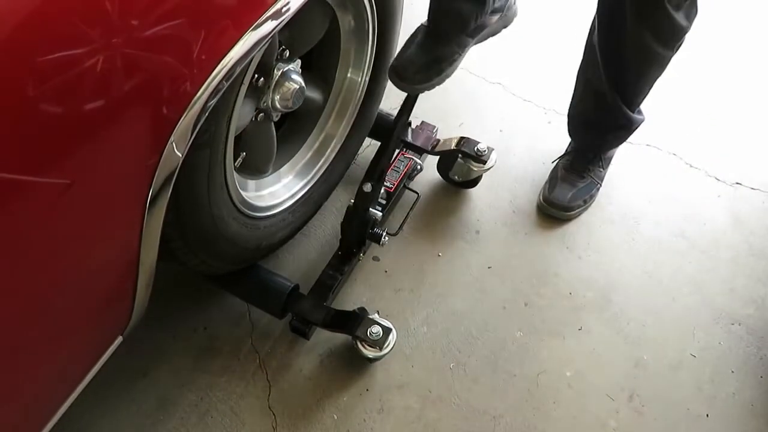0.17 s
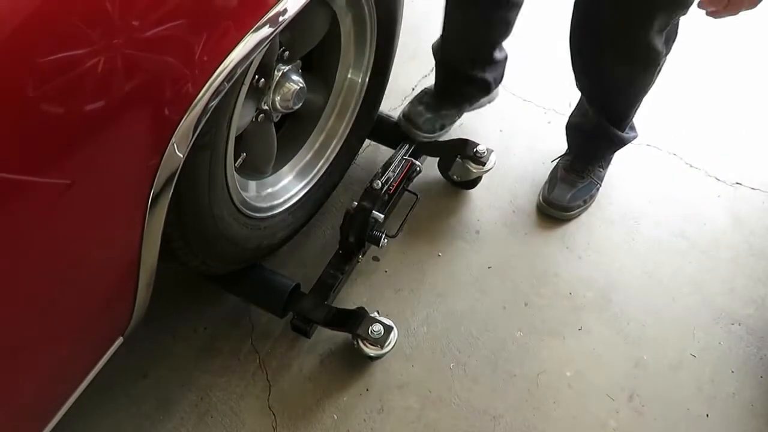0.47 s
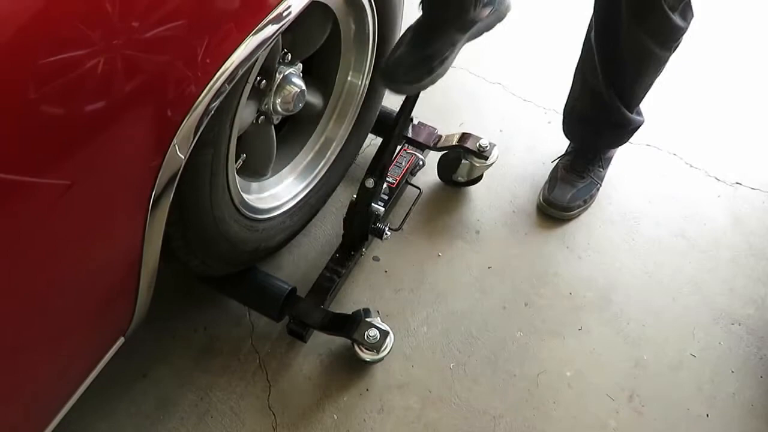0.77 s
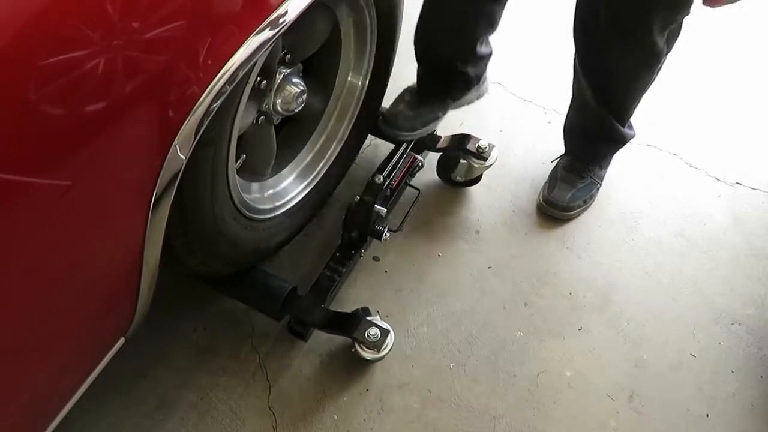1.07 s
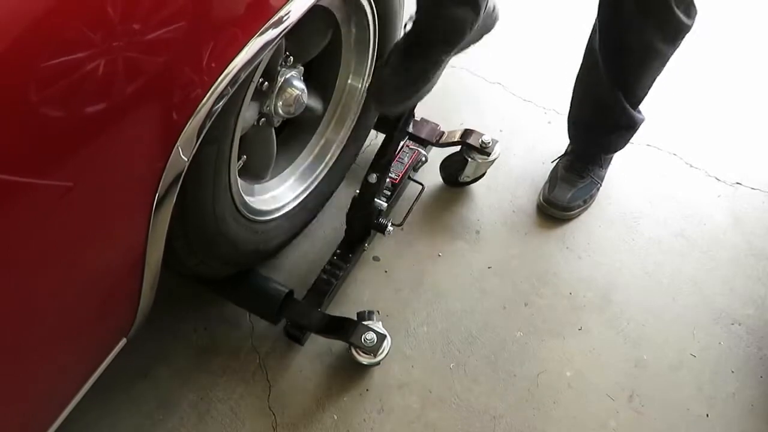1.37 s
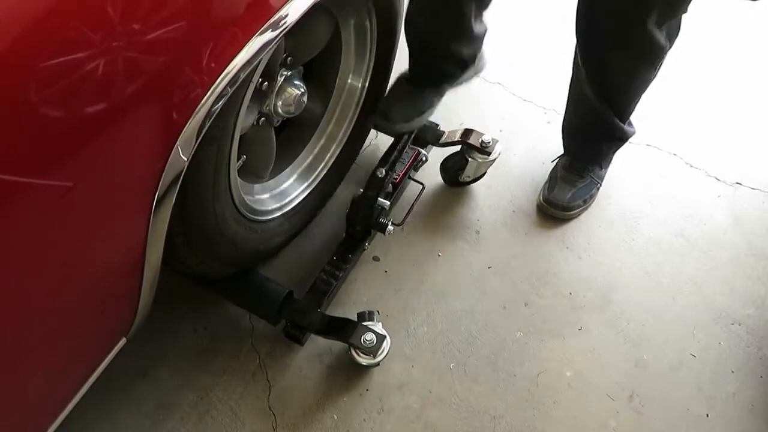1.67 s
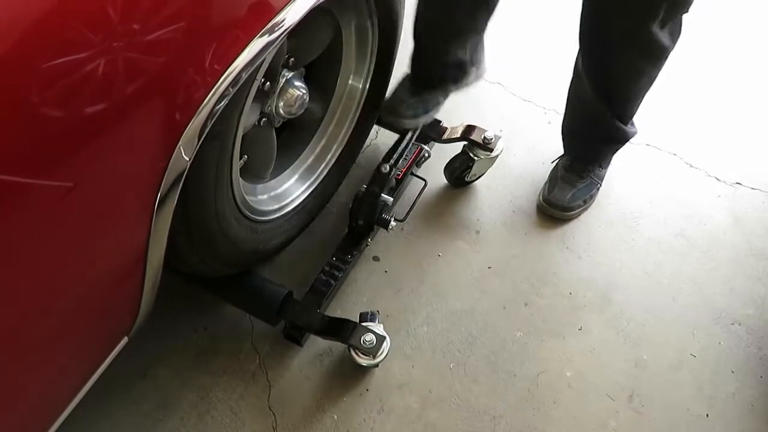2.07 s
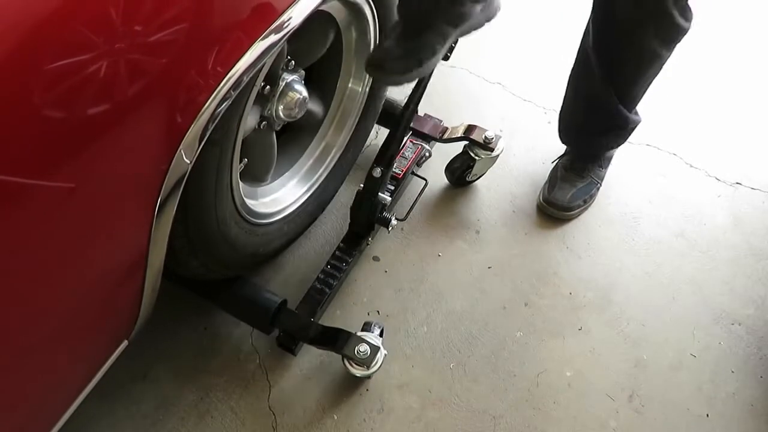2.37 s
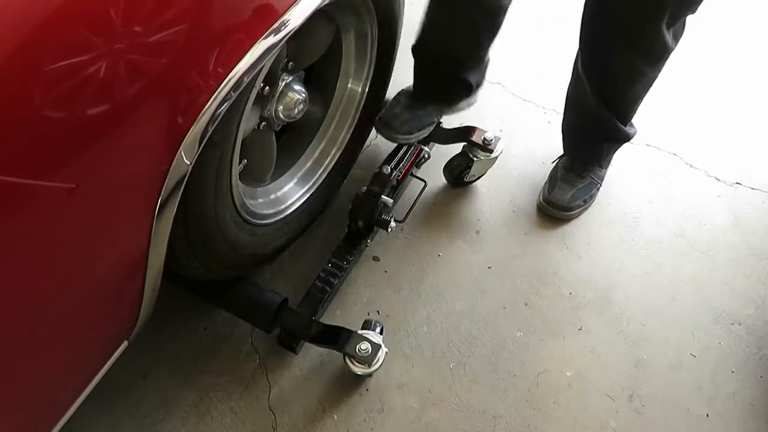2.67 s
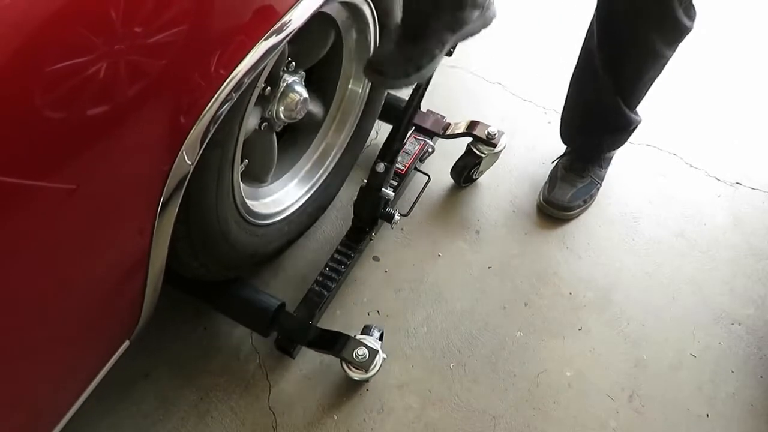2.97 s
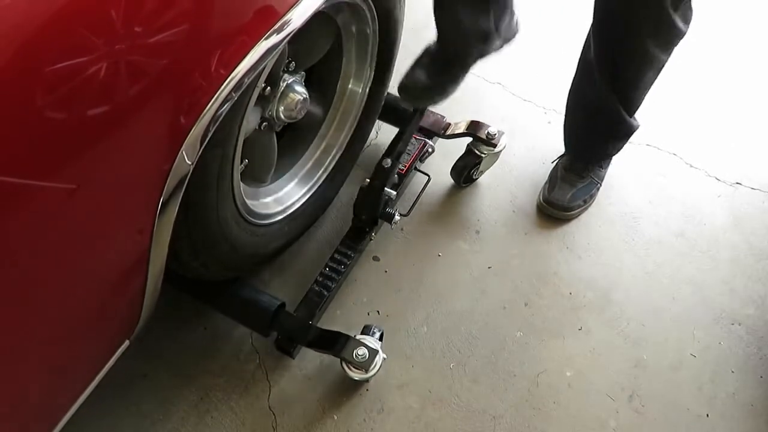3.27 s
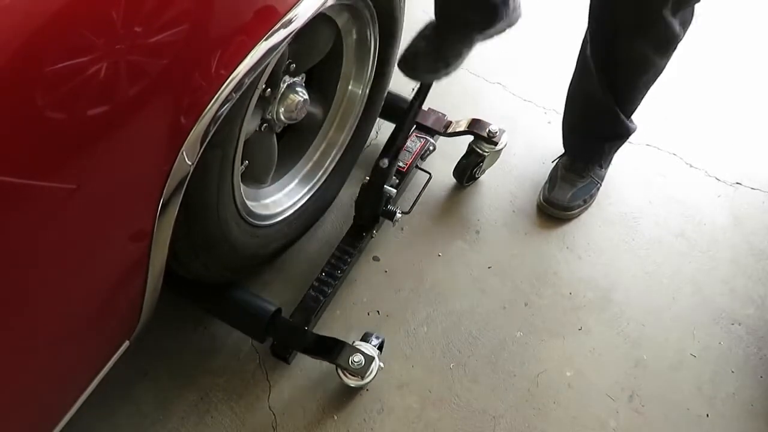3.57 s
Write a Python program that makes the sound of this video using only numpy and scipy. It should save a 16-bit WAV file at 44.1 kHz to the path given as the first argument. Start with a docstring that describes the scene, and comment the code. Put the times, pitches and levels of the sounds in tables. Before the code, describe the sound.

A foot-pumped steel ratchet clacks close by in a garage. A clattering stroke starts near 0.15 s, with looser clicks to 0.6 s. Bursts follow at about 0.8, 1.35, 1.9, 2.45 and 3.05 s, with lighter return clacks between and a last cluster from 3.4 s. Gritty scraping, short metallic rings and soft low thumps accompany them; a tiny squeak chirps at 0.77 s. Short echo, faint room noise.

```python
"""A garage with a concrete floor: a foot pumps the pedal of a steel wheel dolly close to a two-port microphone.
Each stroke drags the pawl over the rack as dense noise grains, with clacks of filtered noise rattle.
The pawl drops home and rings as dying sines, and the frame thumps in low modes under the car's weight.
A brief chirp squeaks once. Sparse random taps make the garage's short tail, over steady coloured noise."""
import sys
import numpy as np
from scipy import signal
from scipy.fft import rfft, irfft
from scipy.io import wavfile
from scipy.ndimage import uniform_filter1d

SR = 44100
rng = np.random.default_rng(int(sys.argv[2]) if len(sys.argv) > 2 else 0)


def natural_amplitude(level_db):
    """Convert a level in decibels to a linear amplitude factor, elementwise."""
    exponent = np.asarray(level_db, float) / 20
    return 10 ** exponent


def waveform_to_disk(signal):
    """Save audio, clipped to [-1, 1], as 16-bit WAV at the path in sys.argv[1]."""
    frames = np.transpose(np.atleast_2d(signal))
    scaled = np.clip(frames, -1, 1) * 32767
    samples = np.round(scaled).astype(np.int16)
    wavfile.write(sys.argv[1], SR, samples)


N = 163170

# Resonances of the steel frame. Each row: frequency in Hz, width in Hz (narrow ones are widened in use),
# relative level in dB.
FRAME = [(463, 28, 8), (600, 42, 6.5), (810, 65, 0.5), (1617, 380, -0.5), (2245, 410, 8.5), (2630, 23, 1.5),
         (3470, 590, 5), (4280, 140, 3.5), (5040, 210, 6), (5920, 60, 2), (7210, 250, 4), (8300, 67, 7),
         (9070, 92, 4.5), (11040, 76, -6), (12670, 71, -7), (13800, 130, 6), (14500, 150, 10)]


def evened(x):
    """Scales to unit rms."""
    return x / np.sqrt(np.mean(x ** 2) + 1e-20)


def read(points, hz):
    """Reads a spectrum table on a log-frequency axis."""
    f, value = np.transpose(points)
    return np.interp(np.log(hz + 1), np.log(f + 1), value)


def add(mix, s, sound):
    """Mixes a sound in at a time in seconds."""
    part = mix[round(s * SR):][:len(sound)]
    part += sound[:len(part)]


def coloured(x, points):
    """Filters by a spectrum table in dB, without phase shift."""
    gain = natural_amplitude(read(points, np.fft.rfftfreq(x.shape[-1], 1 / SR)))
    return irfft(rfft(x) * gain, x.shape[-1])


def ring(modes, t, spread_db, luck, turns=0):
    """Sum of dying sine modes, each struck more or less well."""
    hz, db, t60 = np.transpose(modes)[:, :, None]
    level = natural_amplitude(db + spread_db * luck[:, None] - 60 * t / t60)
    return (level * np.sin(2 * np.pi * (hz * t + turns))).sum(0)


def frame(hz):
    """Response of each resonance of the steel frame."""
    f, width, mode_db = np.transpose(FRAME)[:, :, None]
    width = np.maximum(width, 75)  # least width in Hz
    return natural_amplitude(mode_db) * width / (width + 1j * (hz - f ** 2 / hz))


def room_floor():
    """Steady coloured noise under everything, independent in mid and side."""
    # Each row: frequency in Hz, relative density in dB per Hz.
    floor_colour = [(18, -51), (30, 11.5), (81, 6.5), (540, -14), (1430, -14), (1760, -8.5), (7470, -20.5),
                    (12600, -35.5), (16000, -73)]
    return natural_amplitude(-44.5) * evened(coloured(rng.standard_normal((2, N)), floor_colour))


def earlier_stroke():
    """A short burst at the very start, sent only to the garage: the tail of a stroke just before."""
    # Each row: frequency in Hz, relative density in dB per Hz.
    earlier_colour = [(59, -42), (100, -9), (836, -3), (1170, -11), (2270, -2), (4980, -32), (8640, -50),
                      (16000, -82)]
    out = np.zeros(N)
    add(out, 0, natural_amplitude(-21.5) * evened(coloured(rng.standard_normal(800), earlier_colour)))
    return out


def garage_tails():
    """Sparse taps of random sign, each band dying at its own speed; one tail for mid, one for side."""
    # Decay of the garage. Each row: frequency in Hz, time to fall 60 dB in seconds.
    garage_t60 = [(100, 0.56), (260, 0.71), (700, 0.45), (1840, 0.42), (4850, 0.24), (12800, 0.19)]
    taps = np.zeros((2, SR))
    # one tap at a random place in every 20 samples
    at = np.arange(200, SR - 20, 20) + rng.integers(0, 20, (2, (SR - 201) // 20))
    np.put_along_axis(taps, at, rng.choice([-1., 1.], at.shape), 1)
    hz, t, z = signal.stft(taps, SR, nperseg=256)
    decay = natural_amplitude(-60 * t / read(garage_t60, hz)[:, None])
    tail = signal.istft(z * decay, SR, nperseg=256)[1]
    return tail / np.linalg.norm(tail[0])


def clacks():
    """A short uneven rattle drives the struck part and the frame's resonances, differently at each blow."""
    # Steel on steel. Each row: time in seconds, relative level in dB, pitch of the struck part in Hz,
    # weight below 1.2 kHz in dB and brightness above 5 kHz in dB, both against the band between.
    blows = [(0.0994, -32, 1670, -3, -15), (0.1635, -11.5, 3400, -30, -7), (0.1685, -9.5, 2400, -38, -3),
             (0.1895, -8, 4850, -29, -2), (0.2011, -3.5, 2900, -3.5, -2), (0.2267, 0.5, 1990, -7.5, -14),
             (0.256, -8.5, 2330, 9, 22), (0.3574, -11, 7200, -5, 13), (0.3674, -16.5, 6600, -11, 2),
             (0.4064, -19, 2780, -6, 1.5), (0.4416, -16, 2240, -13, -13), (0.4873, -6, 4540, -8, -0.5),
             (0.5309, -10.5, 2430, -9, -0.5), (0.595, -7.5, 1920, -3.5, -29),
             (0.7952, -10, 3000, -11.5, -1), (0.8115, -3.5, 5040, -35, 5.5), (0.8402, -5.5, 1950, -2, -7.5),
             (0.8641, -4.5, 3300, -8, 20), (0.8804, -8.5, 2250, -10, -7), (0.898, -8, 7800, -10.5, -1.5),
             (0.9553, -10, 6900, -7, 9), (0.965, -6, 7300, -12, 10), (1.0164, -25.5, 6850, 6, 8),
             (1.0522, -14, 5030, -6, -2), (1.0846, -2, 5920, -1.5, 3.5), (1.1238, -13, 6560, -2, 5),
             (1.3345, -17, 3370, -30, -7.5), (1.3405, -15.5, 2310, -35, -1), (1.3562, -7.5, 1850, -20, 3.5),
             (1.3852, -4, 2150, -3, -0.5), (1.4097, -4.5, 2800, -7, 31), (1.4377, -2, 2400, -8, 3.5),
             (1.4864, -14.5, 6100, 3, 17), (1.4966, -7, 7040, -12, 12.5), (1.5438, -20, 5370, -19, 13),
             (1.622, -13, 1540, -32, -4), (1.6574, -2.5, 1260, -7.5, -2), (1.695, -10.5, 1890, 3.5, 7),
             (1.8721, -14, 3370, -20, -4), (1.8927, -4, 5100, -32, 7), (1.9214, -4.5, 5470, -2.5, 1),
             (1.9435, -4, 1940, 2, 8.5), (1.9704, -5.5, 2350, -10.5, 3), (2.035, -10.5, 9400, -18, 7),
             (2.0944, -25, 2060, -13, 15), (2.148, -34.5, 600, 5, -16), (2.1974, -11.5, 3670, -11, -0.5),
             (2.2257, -6.5, 2100, -5, -3), (2.2719, -10.5, 2630, -5.5, 2), (2.4293, -19.5, 620, 5.5, -10),
             (2.4414, -14.5, 3300, -31, 0), (2.4599, -10, 8300, -17, 3), (2.4907, -7, 3750, 0.5, 0),
             (2.513, -3, 2770, -7, 5.5), (2.5358, -1.5, 8800, -20, 6.5), (2.5862, -17, 4500, -30, 18),
             (2.598, -9.5, 8050, -28, 7), (2.6374, -22.5, 1720, -28, 10), (2.72, -27.5, 900, -2, -15),
             (2.7615, -9, 4900, -21, -1.5), (2.7885, -6.5, 4700, -18, -3), (2.7925, -7.5, 2300, 0, -2),
             (2.8035, -16, 1930, 4, -20), (2.832, -11.5, 2600, -10, 4), (2.863, -4.5, 1820, -4, -16),
             (3.039, -13.5, 2320, -33, -1), (3.0585, -6.5, 8400, -38, 3), (3.0937, -4.5, 2400, -5, 3),
             (3.1158, -3.5, 5930, -6, 8.5), (3.1423, -0.5, 8100, -12, 6), (3.1924, -44.5, 7560, -30, 18),
             (3.2033, -10.5, 8100, -34, 10), (3.2479, -19.5, 1710, -35, -2), (3.385, -43, 480, 12.5, -24),
             (3.4097, -32, 3250, -21, -4), (3.4432, -11.5, 3720, -16, -1.5), (3.4788, -8, 1970, -2.5, -3.5),
             (3.5232, -10, 2470, -9, -4.5), (3.5428, -3, 1520, -8, -14)]
    # Each row: frequency in Hz, relative density in dB per Hz.
    clack_colour = [(59, -38), (100, 0.5), (452, -2), (691, 0), (836, 0), (1010, 2.5), (2860, -2),
                    (10000, -18.5), (12700, -10), (16000, -35)]
    clack_db, lead_s = -10, 0.005  # lead: room for the filters to swell ahead of the contact
    rattle_t60_s = 0.056
    tick_db, tick_t60_s = 1, 0.012  # the first contact
    lump_db, patch_db = 2.5, 2.5  # uneven contacts within a blow, uneven colour between blows
    pitch_db, pitch_q, hump_db, hump_octaves = 3, 7, 4, 0.7  # the struck part's ring, the hump around it
    frame_spread_db = 4

    out, t, hz = np.zeros(N), np.arange(8192) / SR, np.fft.rfftfreq(8192, 1 / SR) + 1
    modes = frame(hz)
    low, high = 1 / (1 + (hz / 1200) ** 6), 1 / (1 + (5000 / hz) ** 6)
    bands = [low, 1 - low - high, high]
    # the treble has an envelope of its own
    rise_s = np.array([0.0019, 0.0019, 0.0015])[:, None]
    t60 = np.array([rattle_t60_s, rattle_t60_s, 0.053])[:, None]
    late = np.maximum(t - lead_s, 0)
    decay = natural_amplitude(-60 * late / t60) + natural_amplitude(tick_db - 60 * late / tick_t60_s)
    envelope = (1 - np.exp(-late / rise_s)) * decay

    draws = rng.standard_normal((len(blows), 3, 8192))
    for (s, db, pitch_hz, weight_db, bright_db), (noise, lumps, luck) in zip(blows, draws):
        shape = envelope * natural_amplitude(lump_db * evened(uniform_filter1d(lumps, size=60)))
        body = 1 + (natural_amplitude(frame_spread_db * luck[-len(FRAME):, None]) * modes).sum(0)
        body += natural_amplitude(pitch_db) / (1 + 1j * pitch_q * (hz / pitch_hz - pitch_hz / hz))
        hump = np.exp(-(np.log2(hz / pitch_hz) / hump_octaves) ** 2)
        patches = evened(uniform_filter1d(uniform_filter1d(luck[:len(hz)], size=60), size=60))
        colour_db = read(clack_colour, hz) + hump_db * hump + patch_db * patches
        parts = irfft(rfft(noise * shape) * body * natural_amplitude(colour_db) * bands)
        balance = natural_amplitude(np.array([weight_db, 0, bright_db]))[:, None]
        parts *= balance / np.linalg.norm(parts, axis=1)[:, None]
        # middle and treble together get the energy of a plain decay
        energy = np.sqrt(rattle_t60_s * SR / (2 * np.log(1000))) / np.linalg.norm(parts[1:])
        add(out, s - lead_s, natural_amplitude(db + clack_db) * energy * parts.sum(0))
    return out


def drag():
    """Dense small slips of uneven size, each a tiny burst into the frame, while the pedal moves."""
    # The pawl along the rack, down strokes and returns. Each row: start in seconds, length in seconds, level in dB.
    strokes = [(0.15, 0.077, -27), (0.315, 0.27, -44.5), (0.769, 0.16, -34), (0.937, 0.23, -38),
               (1.327, 0.1, -31.5), (1.397, 0.18, -36), (1.599, 0.19, -42.5), (1.86, 0.11, -30.5),
               (1.984, 0.13, -39.5), (2.184, 0.096, -35), (2.428, 0.088, -27.5), (2.57, 0.14, -47),
               (2.739, 0.18, -40.5), (3.018, 0.11, -33), (3.174, 0.05, -46), (3.35, 0.11, -97)]
    # Each row: frequency in Hz, relative density in dB per Hz.
    drag_colour = [(59, -30), (100, 5.5), (1130, -9.5), (2220, -2), (2800, -2.5), (3250, -1),
                   (14100, -11.5), (16000, -51)]
    slips_per_s, slip_s, rise_s, fall_s = 500, 0.0062, 0.034, 0.025

    sizes = natural_amplitude(2.3 * np.minimum(rng.exponential(1, N), 3))
    slips = sizes * (rng.random(N) < slips_per_s / SR)
    power = signal.lfilter([1], [1, -np.exp(-1 / (SR * slip_s))], slips)
    bursts = power ** .5 * rng.standard_normal(N)
    bursts = irfft(rfft(bursts) * (1 + frame(np.fft.rfftfreq(N, 1 / SR) + 1).sum(0)), N)
    t, (s, length, db) = np.arange(N) / SR, np.transpose(strokes)[:, :, None]
    moving = np.clip((t - s) / rise_s, 0, 1) * np.exp(-np.maximum(t - s - length, 0) / fall_s)
    return evened(coloured(bursts, drag_colour)) * (natural_amplitude(db) * moving).sum(0)


def thumps():
    """Low modes of frame and tyre pushed softly, and the car body's slow wavering boom."""
    # The load shifting on the frame. Each row: time in seconds, relative level of the modes in dB,
    # level of the slow body boom in dB before its soft rise, pitch in Hz near which modes ring most.
    shifts = [(0.201, -27.5, -40, 98), (0.481, -26, -39, 155), (0.597, -34.5, -44, 300),
              (0.784, -26.5, -31, 93), (0.957, -40.5, -23.5, 80.4), (1.088, -28.5, -28.5, 177),
              (1.337, -31, -22, 98), (1.652, -25, -31, 205), (1.873, -29, -24, 106), (2.227, -27, -34, 193),
              (2.425, -31.5, -32, 117), (2.5, -33, -35.5, 155), (2.793, -32.5, -37.5, 184),
              (2.857, -35, -51, 200), (3.088, -31, -48, 132), (3.479, -39.5, -52, 200)]
    # Each row: frequency in Hz, relative level in dB, time to fall 60 dB in seconds.
    chassis = [(72, -6, .3), (93, -3, .3), (122, -3, .25), (155, -2, .22), (195, -2, .2), (245, -3, .2),
               (315, -5, .18), (390, -7, .18), (470, -7, .2)]
    boom_hz, waver_hz, boom_t60_s = 50, 6, 0.6
    hump_db, hump_octaves, rise_s, spread_db = 7.5, 0.38, 0.025, 4

    out, t = np.zeros(N), np.arange(SR) / SR
    hz, mode_db, t60 = np.transpose(chassis)
    lucks = rng.standard_normal((len(shifts), len(chassis)))
    drifts = rng.standard_normal((len(shifts), 21))  # 20 steps of pitch a second
    for (s, db, boom_db, pitch_hz), luck, drift in zip(shifts, lucks, drifts):
        wavering_hz = boom_hz + waver_hz * np.interp(t * 20, np.arange(len(drift)), drift)
        boom = natural_amplitude(boom_db - 60 * t / boom_t60_s) * np.sin(2 * np.pi * np.cumsum(wavering_hz) / SR)
        near_db = hump_db * np.exp(-(np.log2(hz / pitch_hz) / hump_octaves) ** 2)
        modes = np.transpose([hz, mode_db + near_db, t60])
        rung = natural_amplitude(db) * ring(modes, t, spread_db, luck, turns=drift[:len(hz), None])
        add(out, s, (1 - np.exp(-t / rise_s)) * (rung + boom))
    return out


def squeak():
    """A brief high chirp, falling, with its octave, as the pivot takes the load."""
    start_s, length_s, pitch_hz, fall_hz = 0.766, 0.019, 6360, 422
    level_db, octave_db = -16, -7
    out, u = np.zeros(N), np.arange(0, 1, 1 / (SR * length_s))
    turn = 2 * np.pi * np.cumsum(pitch_hz - fall_hz * u) / SR
    swell = np.sin(np.pi * u ** 1.5) ** 2
    chirp = np.sin(turn) + natural_amplitude(octave_db) * swell * np.sin(2 * turn)
    add(out, start_s, natural_amplitude(level_db) * swell * chirp)
    return out


def pawl():
    """The pawl drops into a tooth and rings clear until the next contact damps it."""
    # Each row: time in seconds, relative ring level in dB, seconds until it is damped.
    drops = [(0.897, -19.5, 0.015), (1.439, -18, 0.062), (1.974, -22.5, 0.084), (2.465, -23, 0.0089),
             (2.536, -18, 0.024), (3.057, -28, 0.0094), (3.144, -22, 0.019)]
    # Each row: frequency in Hz, relative level in dB, time to fall 60 dB in seconds.
    pawl_modes = [(1373, -13, .15), (4533, -5, .16), (5110, -10, .15), (8500, 1, .16), (8300, -10, .1),
                  (12450, -13, .06), (13880, -12, .1)]
    out, t = np.zeros(N), np.arange(6000) / SR
    lucks = rng.standard_normal((len(drops), len(pawl_modes)))
    for (s, db, free_s), luck in zip(drops, lucks):
        damping_db = 1500 * np.maximum(t - free_s, 0)  # 1500 dB a second
        add(out, s, natural_amplitude(db - 3 - damping_db) * ring(pawl_modes, t, 1.5, luck))
    return out


def wandering(near):
    """Turns the phase at random: contacts all along the frame reach the ports unevenly."""
    hold_s, swing_rad = 0.002, 1.3  # how long a direction holds, rms swing
    smoother = np.poly([np.exp(-2 / (hold_s * SR))] * 2)
    turn = swing_rad * evened(signal.lfilter([1], smoother, rng.standard_normal(N)))
    return (signal.hilbert(near) * np.exp(1j * turn)).imag


def scene():
    """Direct sound and garage as mid and side, then the two microphone ports."""
    # Gain of the side signal. Each row: frequency in Hz, side minus mid in dB.
    side_gain = [(60, -54), (150, -19), (380, -17), (950, -14.5), (2380, -12.5), (5980, -2.5), (15000, 0)]
    lean_db = -0.8  # left minus right
    air = room_floor()
    near = clacks() + drag() + squeak() + pawl()
    sent = near + earlier_stroke()
    wet = signal.fftconvolve(sent[None], garage_tails(), axes=1)[:, :N] * natural_amplitude(-8.5)
    near = near + thumps()  # thumps stay dry: low modes and boom without garage tail
    mid = near + wet[0] + air[0]
    side = coloured(wandering(near) + wet[1] + air[1], side_gain)
    return np.array([mid + side, mid - side]) * natural_amplitude(np.array([[lean_db / 2], [-lean_db / 2]]))


def band_limit(x):
    """A steep low-pass at the top of the band."""
    return signal.sosfilt(signal.butter(12, 16250, fs=SR, output="sos"), x)


def record(dry):
    """The microphone's bass cut, a soft limit on peaks and the band limit."""
    low_hz, ceiling, edge_hz = 41.3, 0.95, 16250  # ceiling: level the peaks are rounded towards
    cut = signal.sosfilt(signal.butter(4, low_hz, "high", fs=SR, output="sos"), dry)
    soft = ceiling * np.tanh(cut / ceiling)
    band = signal.firwin(511, edge_hz, window=("kaiser", 9), fs=SR)
    limited = signal.oaconvolve(soft, band[None], "same")
    return band_limit(limited)


dry = scene()
out = record(dry)
waveform_to_disk(out)
```